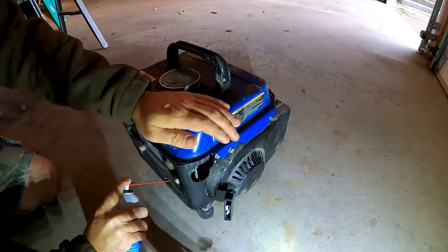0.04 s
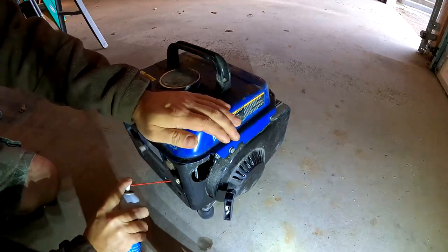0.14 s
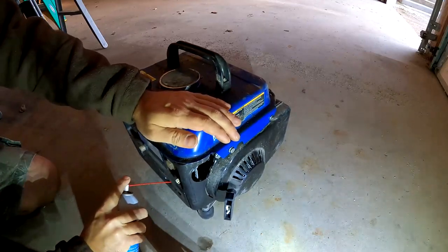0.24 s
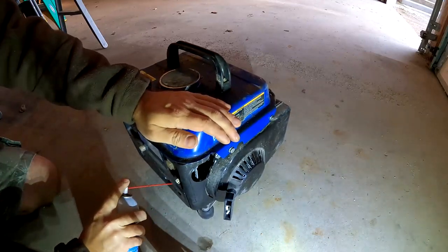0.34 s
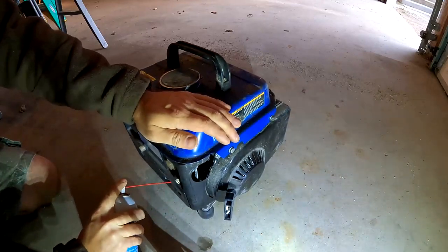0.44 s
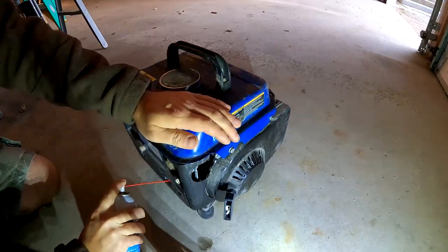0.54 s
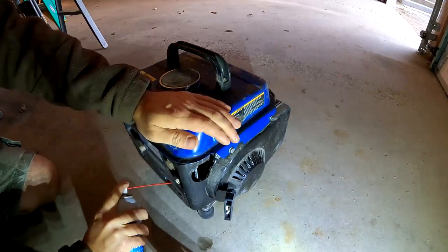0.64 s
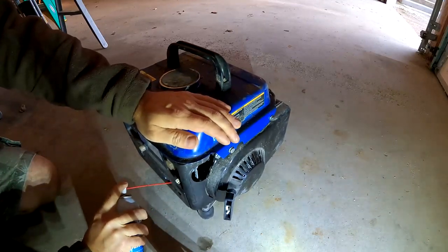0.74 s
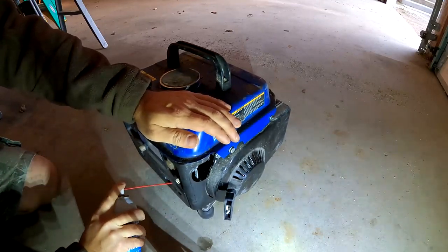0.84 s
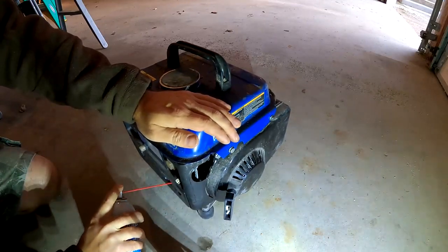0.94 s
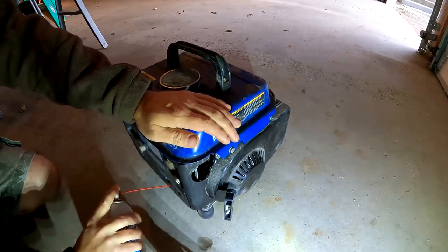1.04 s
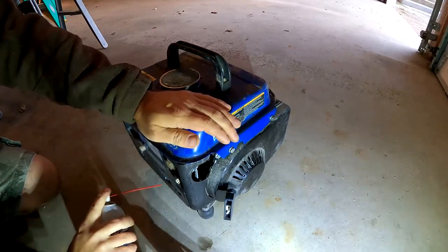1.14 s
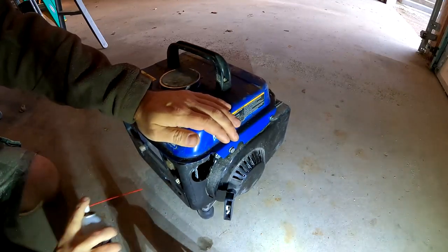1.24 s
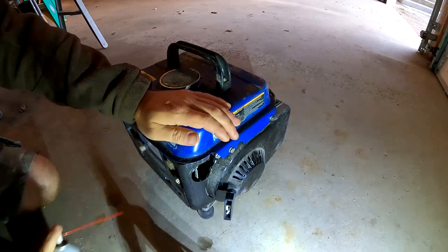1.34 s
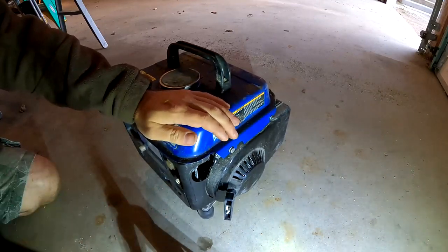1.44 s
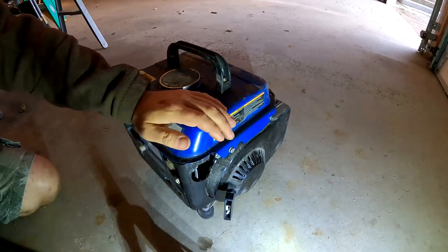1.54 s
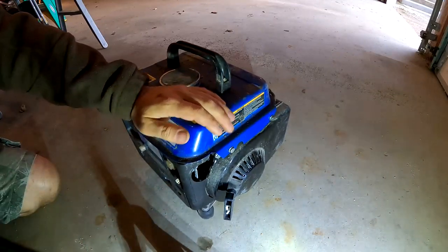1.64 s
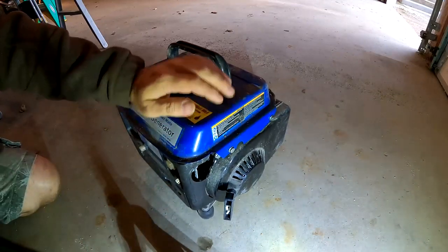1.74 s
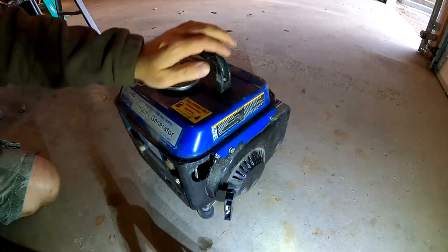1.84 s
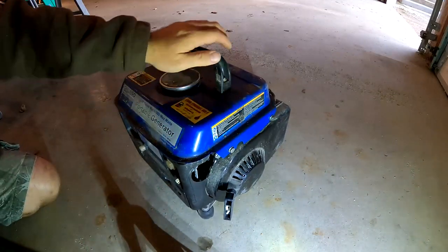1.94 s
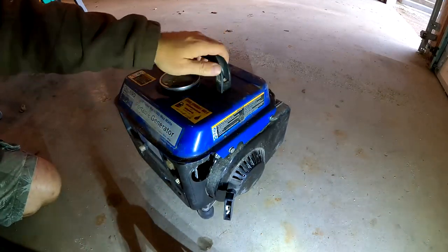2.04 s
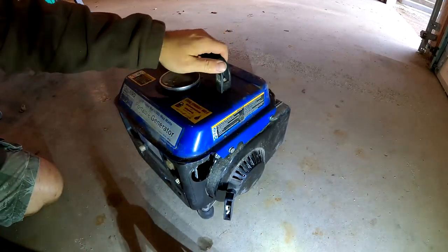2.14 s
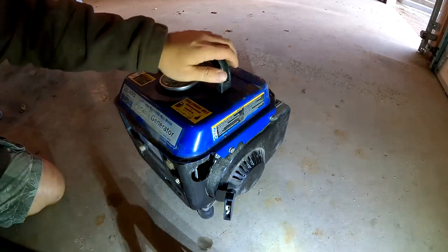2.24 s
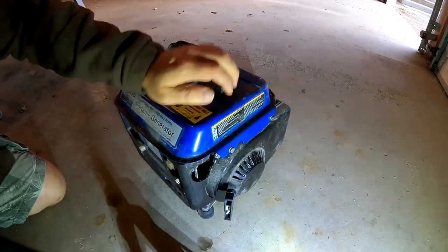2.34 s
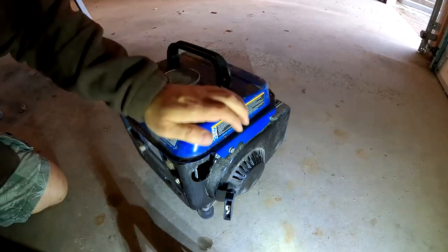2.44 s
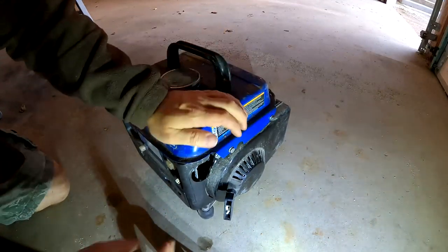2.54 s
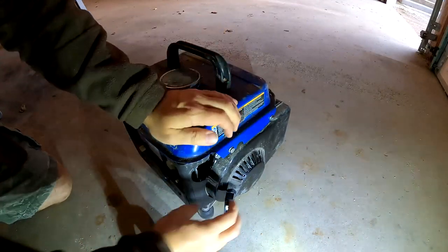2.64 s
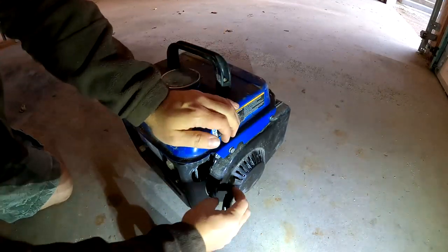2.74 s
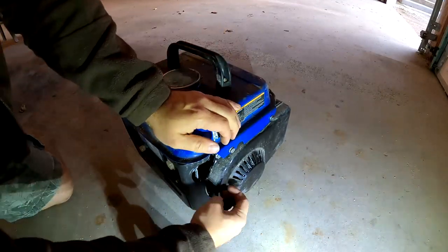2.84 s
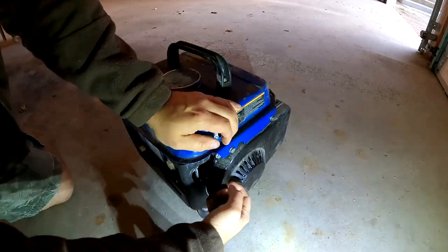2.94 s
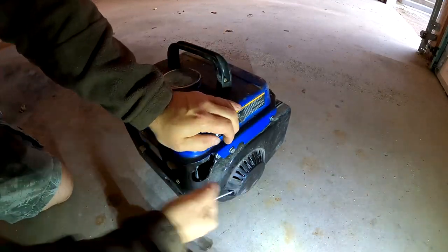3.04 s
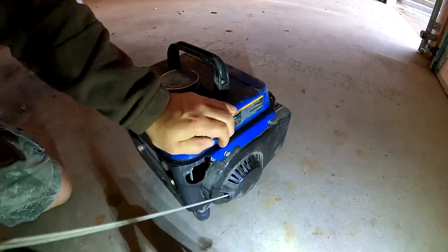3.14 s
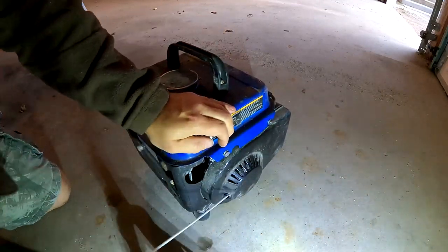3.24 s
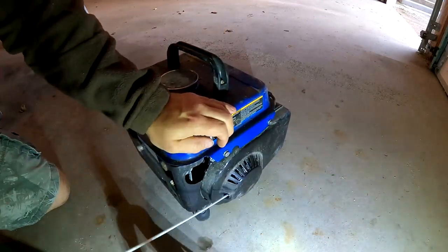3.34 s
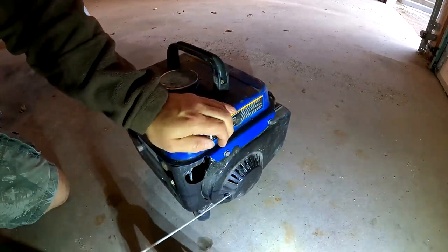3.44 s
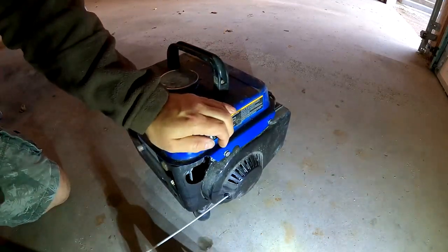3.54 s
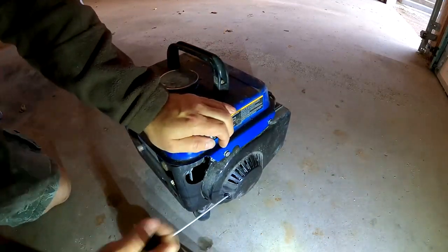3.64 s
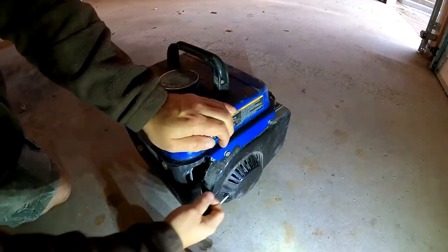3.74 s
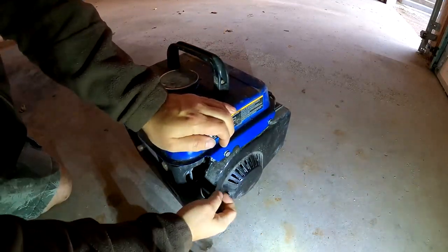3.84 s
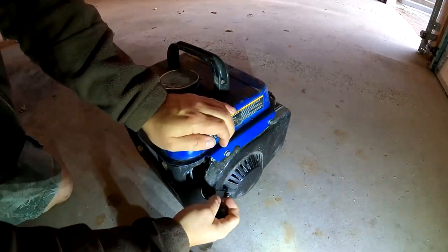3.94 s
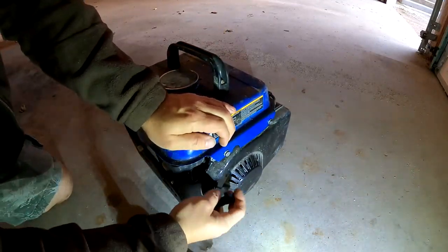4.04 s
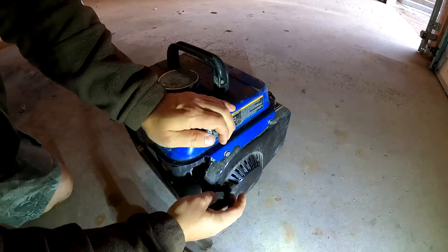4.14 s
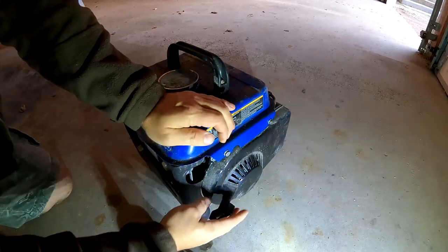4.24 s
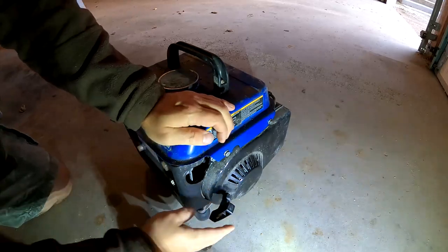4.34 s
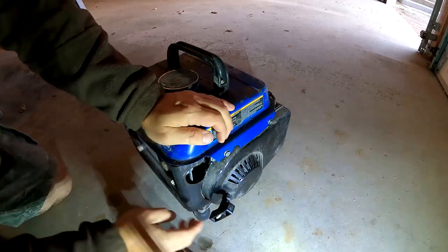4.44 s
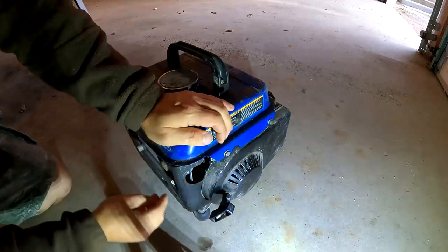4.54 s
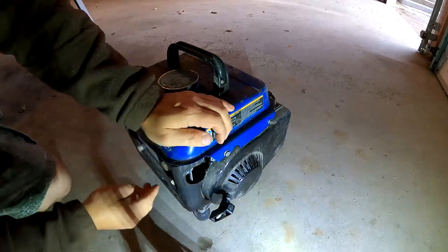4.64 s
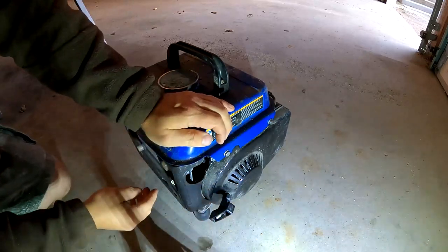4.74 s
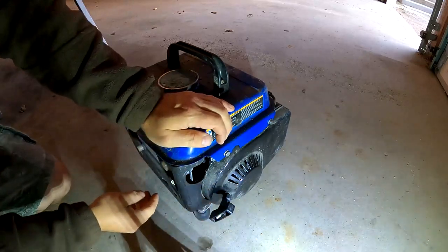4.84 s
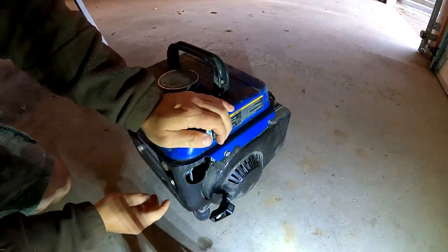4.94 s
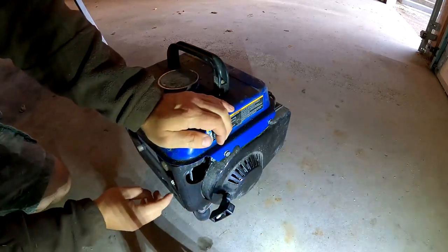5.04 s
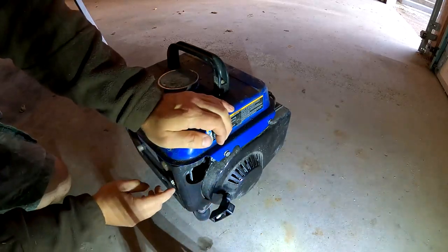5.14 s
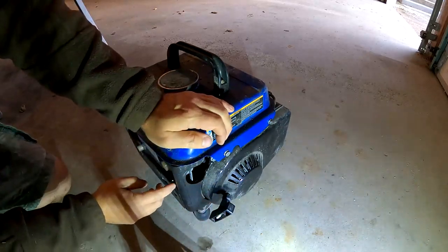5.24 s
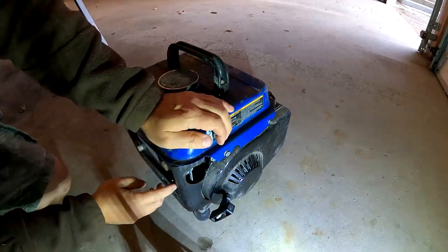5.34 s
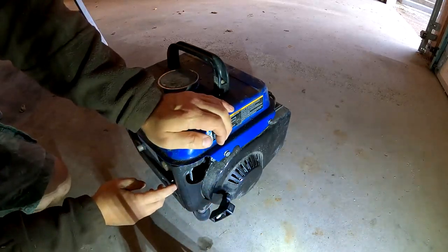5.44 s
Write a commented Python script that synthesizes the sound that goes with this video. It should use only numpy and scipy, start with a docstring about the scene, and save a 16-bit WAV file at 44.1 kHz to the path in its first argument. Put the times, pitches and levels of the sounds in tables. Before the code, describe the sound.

A small generator engine spins fast, slows through chugging thumps and stops without firing, a can clanks down, then a second cord pull does the same.

```python
"""In a garage, a small two-stroke generator is spun by its pull cord and coasts to rest without firing, twice.
Each turn the exhaust port hisses, the muffler thumps and the loose casing knocks: noise bursts and ringing modes.
The rotor growls at odd multiples of its speed, and the fan rushes as noise that grows with speed.
Between the spins a ringing spray can is set down, a sleeve rustles, the starter pawls engage and cloth ticks."""
import sys
import numpy as np
from scipy import signal
from scipy.fft import rfft, irfft, next_fast_len
from scipy.io import wavfile
from scipy.ndimage import uniform_filter1d

SR = 44100
rng = np.random.default_rng(int(sys.argv[2]) if len(sys.argv) > 2 else 0)


def pcm_store(signal):
    """Save signal as 16-bit PCM."""
    levels = np.round(np.clip(np.atleast_2d(signal), -1, 1) * 32767)
    wavfile.write(sys.argv[1], SR, levels.astype(np.int16).T)


N = 242550


def amp(db):
    """Turn decibels into a plain gain."""
    return 10 ** (np.asarray(db) / 20)


def rms_one(x):
    """Scale a signal to an average strength (rms) of 1."""
    return x / np.sqrt(np.mean(x ** 2) + 1e-20)


def filtered(x, order, hz, kind):
    """Keep only the low, high or middle band of a sound."""
    return signal.sosfilt(signal.butter(order, hz, kind, fs=SR, output="sos"), x)


def in_time(rows, column):
    """A dB column as gain over time, practically silent outside the table."""
    rows = np.array(rows)
    return amp(np.interp(np.arange(N) / SR, rows[:, 0], rows[:, column], left=-120, right=-120))


def at_hz(points, hz):
    """Read a table between its points, with pitch on a log scale."""
    points = np.array(points)
    return np.interp(np.log(hz + 1), np.log(points[:, 0]), points[:, 1])


def clicks(times, sizes):
    """Single-sample clicks, on a floor far too small to hear."""
    out = np.full(N, 1e-18)
    np.add.at(out, np.round(np.asarray(times) * SR).astype(int), sizes)
    return out


def ring(x, hz, t60):
    """A unit click starts a cosine of height 1 that falls 60 dB in t60 seconds."""
    decay, step = amp(-60 / (t60 * SR)), 2 * np.pi * hz / SR
    return signal.lfilter([1, -decay * np.cos(step)], [1, -2 * decay * np.cos(step), decay * decay], x)


# How alike left and right are, 1 meaning the same: f/Hz, likeness
LIKENESS = [(60, 1.0), (180, 0.98), (550, 0.93), (1650, 0.7), (4970, 0.66), (9000, 0.91), (15000, 0.15)]


def noise(spectrum):
    """Stereo noise of a given colour, alike in both channels at low pitch; rms 1."""
    hz = np.fft.rfftfreq(N, 1 / SR)
    mid, side = rfft(rng.standard_normal((2, N)))
    alike = np.clip(at_hz(LIKENESS, hz), 0, 1)
    both = np.sqrt(1 + alike) * mid + np.sqrt(1 - alike) * side * [[1], [-1]]
    return rms_one(irfft(both * amp(at_hz(spectrum, hz)), N))


def bursts(rows, t60, rise_s):
    """Envelope of sudden onsets that die away, each cut off after 0.7 s."""
    out = np.zeros(N)
    for s, db, *_ in rows:
        start = round(s * SR)
        t = np.arange(min(int(.7 * SR), N - start)) / SR
        out[start:][:len(t)] += amp(db - 60 * t / t60) * (1 - np.exp(-t / rise_s))
    return out


def gas_pulses(s, db, modes, width_s, dull_db):
    """A smooth push, such as a slug of gas, sets low modes ringing; dull_db is lost per octave above the second."""
    slug = np.hanning(int(width_s * SR))
    rings = 0
    for hz, level_db, t60 in modes:
        octaves_up = np.log2(hz / modes[1][0])
        sizes = amp(db + level_db - dull_db * octaves_up + rng.normal(0, 2.43, len(s)))
        rings = rings + ring(clicks(s, sizes), hz, t60)
    pushed = signal.fftconvolve(rings, slug / slug.sum(), "same")
    return filtered(pushed, 2, 25, "high")


def by_event(rows, count, spread_db):
    """Gains for several modes that change at every event, as no two contacts hit the same spot."""
    latest = np.searchsorted(np.array(rows)[:, 0], np.arange(N) / SR, side="right") - 1
    gains = amp(spread_db * rng.standard_normal((len(rows), count)))
    return gains[latest].T


def in_order(*rows):
    """Join event lists and sort them by time, dropping any that fall before the start."""
    rows = np.vstack(rows)
    rows = rows[rows[:, 0] > 0]
    return rows[np.argsort(rows[:, 0])]


# Colour of the still air: f/Hz, level/dB (relative)
AIR = [(15, -18), (25, -6), (52, -6.5), (126, -4.5), (204, -2.5), (260, -12.5), (826, -23), (2420, -17.5),
       (2630, -23.5), (3340, -22), (6210, -26), (13200, -43), (15500, -81.5)]
AIR_DB = -57


def room_air():
    """Steady, faint noise fills the background, strongest at low pitch."""
    return amp(AIR_DB) * noise(AIR)


GARAGE_T60_S, WALL_CUT_HZ = 0.88, 13000


def garage(x):
    """Eight echoing paths a side, duller on every round."""
    x = filtered(x, 2, 300, "high")   # the echoes carry little bass
    size = next_fast_len(N + SR)
    w = 2 * np.pi * np.fft.rfftfreq(size)
    dull = 1 / (1 + 1j * w * SR / (2 * np.pi * WALL_CUT_HZ))
    paths = np.zeros((2, len(w)), complex)
    for k, lag_s in enumerate(rng.uniform(.02, .055, 16)):
        delay = np.exp(-1j * w * round(lag_s * SR))
        loop = amp(-60 * lag_s / GARAGE_T60_S) * dull ** (lag_s / 0.12) * delay
        paths[k % 2] += loop / (1 - loop) * (-1) ** (k // 2)
    return irfft(rfft(x, size) * paths, size)[:, :N]


# Sleeve and cord rubbing: t/s, level/dB
RUSTLE = [(1.6, -70), (1.75, -61), (1.95, -82), (2.1, -53.5), (2.35, -56.5), (2.48, -65.5), (2.6, -55.5),
          (2.7, -57.5), (2.74, -49), (2.85, -49), (2.96, -37), (3.1, -48.5), (3.2, -50)]
# Colour of the rubbing: f/Hz, level/dB (relative)
CLOTH = [(71, -40.5), (120, -25), (221, 3), (319, -7), (498, -6), (846, -12.5), (5060, -8), (12100, -20),
         (13700, -31.5), (15500, -62)]
# The clearest cloth ticks: t/s, level/dB (relative), f/Hz
TICKS = [(1.6054, -33.5, 2160), (1.8967, -34.5, 2360), (2.182, -30, 4050), (2.332, -33, 4600),
         (2.4154, -33, 2830), (2.438, -39, 7200), (2.7117, -35, 3960), (2.7272, -32, 7630),
         (2.7406, -28.5, 5340), (2.9764, -29, 4480), (5.0538, -34, 6400), (5.082, -35.5, 2030),
         (5.2215, -35.5, 6160), (5.2844, -29.5, 3480), (5.3564, -36, 4660)]
# Stretches with five faint ticks each, at random moments: from t/s, to t/s
FAINT_TICK_SPANS = [(2.3, 2.7), (4.95, 5.49)]
FAINT_TICK_DB = -37.5   # middle level, on the same scale as the clear ticks


def cloth():
    """Rubbing cloth gives grainy noise, and single dry ticks ring very briefly."""
    slow_wander = rms_one(signal.lfilter([1], [1, -1.98, .9801], rng.standard_normal(N)))
    rubbing = rms_one(amp(1.8 * slow_wander) * noise(CLOTH))
    faint = [(rng.uniform(a, b), FAINT_TICK_DB + rng.normal(0, 3), rng.uniform(2200, 5000))
             for a, b in FAINT_TICK_SPANS * 5]
    ticks = sum(ring(clicks([s], [amp(db)]), hz, 0.0013) for s, db, hz in TICKS + faint)
    ticks = filtered(ticks, 2, 1500, "high")
    left_right = amp(np.array([[2.], [-2.]]))
    return in_time(RUSTLE, column=1) * rubbing * left_right + amp(-0.5) * ticks


# The can touches and lands, then rocks on its rim: t/s, level/dB (relative)
ROCKS = [(2.0, 4), (1.989, -21.5), (2.05, -9), (2.18, -14), (2.372, -23)]
# Ringing of the steel shell: f/Hz, level/dB (relative), t60/s
CAN = [(1076, -36.5, 0.34), (1080, -38.5, 0.57), (1100, -37, 0.49), (1130, -36, 0.61), (1233, -30, 0.0824),
       (1480, -35, 0.066), (1560, -50, 0.96), (1694, -35, .2), (1920, -56, 0.55), (2000, -50, 0.13),
       (4080, -29.5, 0.086), (7400, -27, .06)]
# Colour of the room tail after the landing: f/Hz, level/dB (relative)
CAN_TAIL = [(88, -27), (150, -8.5), (797, -5), (1080, -4.5), (1230, -5), (2020, -2), (2840, -29),
            (7480, -26), (14000, -42)]
CAN_S, CAN_DB, CAN_PAN_DB = 2.0, -6.5, 5   # landing time, crack level (relative), left above right


def spray_can():
    """A steel can meets concrete: a crack, a thud, the shell modes and a room tail of noise that dies away."""
    s, db = np.transpose(ROCKS)
    shell = 0
    for hz, level_db, t60 in CAN:
        sizes = amp(db + level_db + rng.normal(0, 1.4, len(s)))
        shell = shell + ring(clicks(s, sizes), hz, t60)
    hit = clicks([CAN_S], [amp(CAN_DB)])
    crack = ring(hit, 1400, 0.013) + amp(-3.5) * ring(hit, 4400, 0.0081) + ring(hit, 7400, 0.016)
    struck = filtered(shell + crack, 2, [350, 3000], "band")
    thud_modes = [(73.0, -44.5, 0.34), (154, -31.0, 0.098), (336, -32.5, .04)]   # f/Hz, level/dB, t60/s
    thud = gas_pulses(s, db, thud_modes, width_s=0.0021, dull_db=-3.5)
    tail = bursts([(CAN_S, -33)], .7, rise_s=0.0016) * noise(CAN_TAIL)
    return thud + (struck + tail) * amp(np.array([[.5], [-.5]]) * CAN_PAN_DB)


# The hand on the grip, then the cord snapping taut: t/s, level/dB (relative)
BUMPS = [(2.6, -43), (2.774, -41), (2.814, -40), (2.946, -43), (2.964, -50), (3.028, -31), (3.173, -12.5)]


def starter_bumps():
    """Dull bumps at the starter: soft pushes set two low modes ringing."""
    modes = [(214, 0.5, 0.055), (296, -4, 0.056)]   # f/Hz, level/dB, t60/s
    return gas_pulses(*np.transpose(BUMPS), modes, width_s=0.0031, dull_db=3)


# Low pops of the air box and dull clunks at the starter: t/s, level/dB (relative)
POPS = [(0.36, -14), (0.4574, -25), (0.7096, -20), (0.8002, -28.5), (0.936, -29), (1.0775, -30.5),
        (1.2623, -29), (3.0294, -41), (3.1756, -21.5), (3.2342, -11.5), (3.9403, -18.5), (4.043, -19.5),
        (4.1893, -28.5), (4.3527, -33.5)]
# Ringing of these pops and clunks: f/Hz, level/dB (relative), t60/s
AIRBOX = [(81, -21, 0.45), (191.7, 0, 0.09), (286.5, -9, 0.084)]


def low_pops():
    """Low pops of the air box and dull clunks at the starter: short pushes set three low modes ringing."""
    return gas_pulses(*np.transpose(POPS), AIRBOX, width_s=0.0025, dull_db=0.5)


# Crank speed, one table per spin; the cord pulls it up, friction and compression drag it down:
# t/s, speed/(turns per s)
SPEED = [
    [(0, 23.53), (.09, 19.98), (.2, 28.09), (.25, 24.95), (.74, 11.41), (.83, 8.38), (.95, 7.62),
     (1.376, 4.21), (1.7, .5)],
    [(3.2, 9.0), (3.3, 20.61), (3.41, 27.59), (3.47, 25.27), (3.88, 13.07), (4.07, 7.57), (4.2, 7.12),
     (4.461, 4.81), (4.8, .5)],
]
# Crank angle as each spin's table begins, where a whole number is a thump: angle/turns
START_TURN = [-.21, -.036]


def crank():
    """Per spin: speed, and the angle in turns that adds up from it over time."""
    t = np.arange(N) / SR
    speeds = [np.interp(t, *np.transpose(rows), left=0, right=0) for rows in SPEED]
    return [(speed, start + np.cumsum(speed) / SR) for speed, start in zip(speeds, START_TURN)]


def turns(lead=0):
    """Moments a given share of a turn before every thump, and how long a turn lasts just then."""
    s, turn_s = [], []
    for speed, angle in crank():
        at = np.searchsorted(angle, np.arange(int(angle[-1]) + 1) - lead)
        at = at[at > 1]
        s = np.append(s, at / SR)
        turn_s = np.append(turn_s, 1 / np.maximum(speed[at], 1))
    return s, turn_s


# Loudness of the turning engine, one table per spin (relative):
# t/s, growl level/dB, thump level/dB, casing kick level/dB
SPIN = [
    [(0, -30, -17, -9.5), (.2, -38.5, -16.5, -18), (.4, -33.5, -16, -14.5), (.65, -34.5, -14, -10),
     (.9, -32.5, -14, -9), (1.2, -46, -18, -13), (1.65, -52, -15.5, -12.5)],
    [(3.1, -54, -30, -14), (3.2, -29.5, -20, -18), (3.3, -26, -11.5, -10), (3.42, -21, -16.5, -14.5),
     (3.5, -22.5, -19, -17), (3.7, -36, -14, -11.5), (4.1, -40.5, -14.5, -10), (4.3, -43, -20, -14.5),
     (4.85, -49, -19, -11)],
]


def spin_db(s, column):
    """Read one level of the turning engine at the given moments."""
    rows = np.vstack(SPIN)
    return np.interp(s, rows[:, 0], rows[:, column])


# Rush at 25 turns per s, one number per spin: level/dB
RUSH_DB = [-24, -20.5]
# Colour of the rush: f/Hz, level/dB (relative)
RUSH = [(71, -30.5), (120, 9.5), (208, -2.5), (519, -10.5), (1350, -10.5), (2340, -17.5), (3110, -18.5),
        (3810, -18.5), (7450, -29), (12400, -37.5), (15500, -72.5)]
RUSH_POWER, RUSH_LAG_S = 1.88, .03   # growth with speed, and the span the speed is averaged over


def fan_rush():
    """Fan and bearings rush as noise that grows as a power of the speed."""
    level = 0
    for (speed, _), rush_db in zip(crank(), RUSH_DB):
        smooth_speed = uniform_filter1d(speed, int(RUSH_LAG_S * SR))
        level = level + amp(rush_db) * (smooth_speed / 25) ** RUSH_POWER
    return level * noise(RUSH)


def rotor_growl():
    """Odd multiples of the speed growl, and air churns in the crankcase once a turn."""
    growl = 0
    air = rms_one(filtered(rng.standard_normal(N), 2, [280, 850], "band"))
    for (_, turn), spin in zip(crank(), SPIN):
        angle = 2 * np.pi * turn
        orders = np.sin(9 * angle) + .6 * np.sin(7 * angle) + .4 * np.sin(11 * angle)
        stroke = amp(3.8 * np.cos(angle - .8))   # swells once a turn
        growl = growl + in_time(spin, column=1) * (orders + amp(-9.5) * air) * stroke
    return filtered(growl, 4, 90, "high")


# Stray knocks on casing and tank (rebounds, pawls, the cord handle):
# t/s, level/dB (relative), treble level/dB (added to the level)
KNOCKS = [(0.372, -23, -14), (0.418, -18.5, -12), (0.655, -16.5, -9), (0.853, -19, -3), (0.964, -23, -22),
          (1.043, -16.5, -23), (1.105, -23, -3.5), (1.213, -17, -14.5), (1.307, -31.5, -22),
          (1.46, -22, -18.5), (1.687, -27, -34), (2.598, -32, -23), (2.849, -33.5, -10), (3.095, -7, -24),
          (3.149, -12.5, 1.5), (3.162, -7, -3.5), (3.234, -16.5, -2), (3.259, -12, -19), (3.286, -14, 2.5),
          (3.449, -11.5, 0.5), (3.811, -20.5, 6), (3.884, -17.5, 0), (3.959, -31, 0), (3.978, -20, -26.5),
          (4.062, -22.5, -9.5), (4.157, -16.5, -14), (4.212, -22.5, -4), (4.282, -6.5, -16),
          (4.314, -27, -13.5), (4.362, -8, -18), (4.519, -21, -16), (4.655, -26, -7.5), (4.713, -14, -20.5),
          (4.894, -33.5, -23)]
# How early a turn kicks the casing before the thump: turn length t/s, lead t/s
KICK_LEAD = [(.04, .003), (.075, .014), (.17, .015), (.24, .021)]
KICK_TREBLE_DB, KICK_DULL_DB_PER_S = -13, 120   # treble at a 0.045 s turn, and its loss as turns lengthen
KICK_SPREAD_DB, TREBLE_SPREAD_DB = 0.3, 1


def all_knocks():
    """One kick a turn, duller as the crank slows, and the strays; the first turn of a spin is too gentle."""
    s, turn_s = turns()
    chance = rng.standard_normal((len(s), 2))
    kick_s = s - np.interp(turn_s, *np.transpose(KICK_LEAD))
    kick_db = spin_db(s, column=3) + KICK_SPREAD_DB * chance[:, 0]
    treble_db = KICK_TREBLE_DB - KICK_DULL_DB_PER_S * (turn_s - .045) + TREBLE_SPREAD_DB * chance[:, 1]
    kicks = np.c_[kick_s, kick_db, treble_db]
    return in_order(kicks[np.diff(s, prepend=-1) < .5], KNOCKS)


# Ringing of the casing: f/Hz, level/dB (relative), t60/s
CASING = [(500, -20, .05), (650, -13, .04), (740, -7, .05), (890, -9, .04), (970, -8, .05), (1050, -4, .05),
          (1170, -6, .04), (1265, -4, .05), (1330, -3, .06), (1430, -3, .04), (1520, -7, .04),
          (1600, -8, .04), (1700, -7, .045), (1900, -10, .03), (2150, -15, .08), (2700, -15, .04),
          (3100, -14, .04), (3500, -19, .07)]


def casing():
    """Each knock is a short rattle of contacts into the casing modes, with a crack on top; loose parts shiver on."""
    knocks = all_knocks()
    rattle = bursts(knocks, .025, rise_s=0.00015)
    shiver = bursts(knocks, .22, rise_s=0.0044)
    contacts = rng.standard_normal((len(CASING), N)) * (rattle + amp(-16) * shiver)
    contacts = contacts * by_event(knocks, len(CASING), spread_db=1.2)
    body = sum(amp(db) * ring(w, hz, t60) for w, (hz, db, t60) in zip(contacts, CASING))
    body = filtered(body, 2, [550, 3200], "band")
    crack = bursts([(s, db + treble_db) for s, db, treble_db in knocks], .07, rise_s=0.00034)
    bright = filtered(rng.standard_normal(N), 2, [2000, 4600], "band")
    return amp(-27.5) * body + amp(-0.5) * crack * bright


# Strength of the port hiss, gone once the crank is slow: t/s, level/dB (relative)
HISS = [(.03, -10), (.08, -17), (.13, -8.5), (.35, -10.5), (.42, -11), (.59, -10.5), (.66, -26), (.74, -20),
        (.85, -43), (1.7, -70), (3.16, -50), (3.25, -11.5), (3.39, -8), (3.5, -11), (3.64, -7),
        (3.81, -10.5), (3.88, -12.5), (3.96, -42), (4.8, -70)]
# Stray bursts of gas and clashes of parts: t/s, level/dB (relative)
PUFFS = [(0.0034, -14.5), (0.758, -15.5), (0.85, -23.5), (0.9354, -30), (1.0794, -31), (1.163, -20.5),
         (1.292, -36), (1.486, -45), (3.1492, -19), (3.1603, -14.5), (3.253, -13), (3.297, -8.5),
         (3.458, -19), (4.189, -18.5), (4.361, -42)]
HISS_LEAD_TURNS = .46   # the port hisses about half a turn early
SPIT_LEAD_S, SPIT_LEAD_TURNS = .004, .1   # and spits just before the thump; the two leads add up
SPIT_DB, SPIT_SLOW_S, SPIT_FADE_DB_PER_S = -20.5, .1, 242   # fades once a turn is longer than SPIT_SLOW_S
PUFF_SPREAD_DB = 1.58


def all_puffs():
    """Two bursts of gas a turn, weaker as the crank slows, and the strays."""
    (hiss_s, _), (s, turn_s) = turns(HISS_LEAD_TURNS), turns()
    chance = PUFF_SPREAD_DB * rng.standard_normal((len(s), 2))
    hiss_db = np.interp(hiss_s, *np.transpose(HISS)) + chance[:len(hiss_s), 0]
    spit_s = s - SPIT_LEAD_S - SPIT_LEAD_TURNS * turn_s
    spit_db = SPIT_DB - SPIT_FADE_DB_PER_S * np.maximum(turn_s - SPIT_SLOW_S, 0) + chance[:, 1]
    return in_order(np.c_[hiss_s, hiss_db], np.c_[spit_s, spit_db], PUFFS)


# Colour of the gas bursts: f/Hz, level/dB (relative)
PUFF = [(880, -11.5), (1500, 4), (2400, -8.5), (3090, 1), (3340, -1), (4270, -3.5), (7520, 2.5),
        (8290, -4.5), (12400, -13), (14000, -24), (15500, -52)]
# Ringing of the cylinder fins and fan ring: f/Hz, level/dB (relative), t60/s
FINS = [(2620, -17, 0.07), (3057, -10, 0.027), (3516, -12.5, 0.19), (4170, -10.5, 0.024),
        (4480, -14.5, 0.077), (5320, -16, 0.08), (6230, -20.5, 0.069), (6500, -13.5, 0.06),
        (7100, -14.5, 0.071), (7720, -13.5, 0.017)]


def port_hiss():
    """Gas bursts out as noise, brighter when strong, part of it ringing in the metal fins."""
    puffs = all_puffs()
    burst = bursts(puffs, .11, rise_s=0.00047)
    push = rng.standard_normal((len(FINS), N)) * burst * by_event(puffs, len(FINS), spread_db=2.5)
    fins = sum(amp(db) * ring(w, hz, t60) / np.sqrt(t60 * SR) for w, (hz, db, t60) in zip(push, FINS))
    hiss = noise(PUFF)
    dull = filtered(hiss, 2, 4500, "low")
    brightness = (burst / amp(-5.0)) ** 0.12
    return amp(-12) * burst * (dull + (hiss - dull) * brightness) + amp(0.5) * fins


# Ringing of the muffler: f/Hz, level/dB (relative), t60/s
MUFFLER = [(42.2, -21.5, 0.07), (56.2, -8.5, 0.51), (70.5, -3, 0.26), (79.4, -13, 0.15), (127, -4, 0.087),
           (198, 0.5, 0.085), (236, -10.5, 0.11), (333, -1.5, 0.065)]
# Ringing of the tail pipe: f/Hz, level/dB (relative), t60/s
TAIL_PIPE = [(372, -17.5, 0.038), (718, -7.5, 0.054)]
# The crank rocks back against compression: t/s, level/dB (relative)
ROCK_BACK = [(4.6236, -29), (4.703, -30.5)]
THUMP_SPREAD_DB = .8


def muffler():
    """Slow turns push the gas out gently, so their thumps are duller; the tail pipe pops a moment later."""
    s, turn_s = turns()
    rock_s, rock_db = np.transpose(ROCK_BACK)
    db = spin_db(s, column=2) + THUMP_SPREAD_DB * rng.standard_normal(len(s))
    s, db = np.append(s, rock_s), np.append(db, rock_db)
    slowness = np.append(turn_s, [turn_s[-1]] * len(rock_s)) - .045   # seconds beyond a quick turn
    thumps = gas_pulses(s, db, MUFFLER, width_s=0.0046, dull_db=84 * slowness)
    pops = gas_pulses(s + 0.00498, db - 90 * slowness, TAIL_PIPE, width_s=0.00064, dull_db=-0.5)
    return thumps + pops


# Balance of the engine's upper sounds: f/Hz, left minus right level/dB
BALANCE_DB = [(250, 0.5), (500, 1), (1500, -1), (8000, -0.1), (14000, -0.5)]
LEFT_LAG_S = .000011   # the engine stands a little nearer the right microphone


def place_engine(x):
    """Sound from one side reaches the two microphones with slightly different level and time."""
    hz = np.fft.rfftfreq(N, 1 / SR)
    balance = amp(at_hz(BALANCE_DB, hz) * [[.5], [-.5]])
    lag = np.exp(-2j * np.pi * hz * [[LEFT_LAG_S], [0]])
    return irfft(rfft(x) * balance * lag, N)


GARAGE_DB = -23.5   # gain of the echoes


def scene():
    """Mix everything; only the upper engine sounds, can and cloth echo in the garage."""
    low = muffler() + low_pops() + starter_bumps()
    engine = place_engine(casing() + port_hiss() + rotor_growl() + fan_rush())
    near = engine + spray_can() + cloth()
    return low + near + amp(GARAGE_DB) * garage(near.mean(0)) + room_air()


def record(dry):
    """The top is cut steeply above 15500 Hz."""
    return signal.sosfilt(signal.ellip(10, 1, 70, 15500, fs=SR, output="sos"), dry)


dry = scene()
out = record(dry)
pcm_store(out)
```